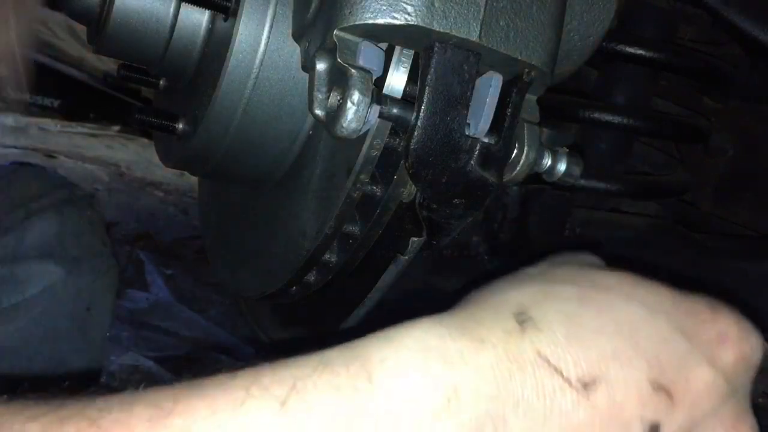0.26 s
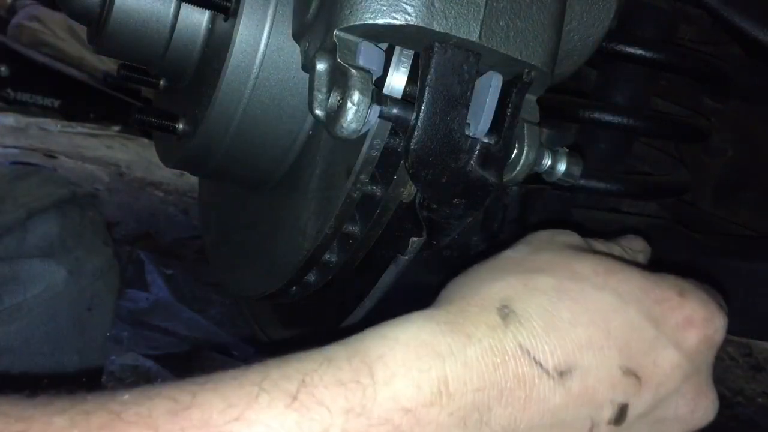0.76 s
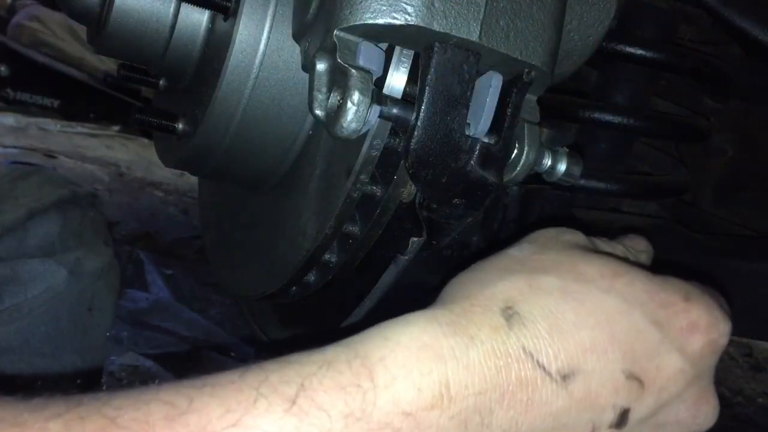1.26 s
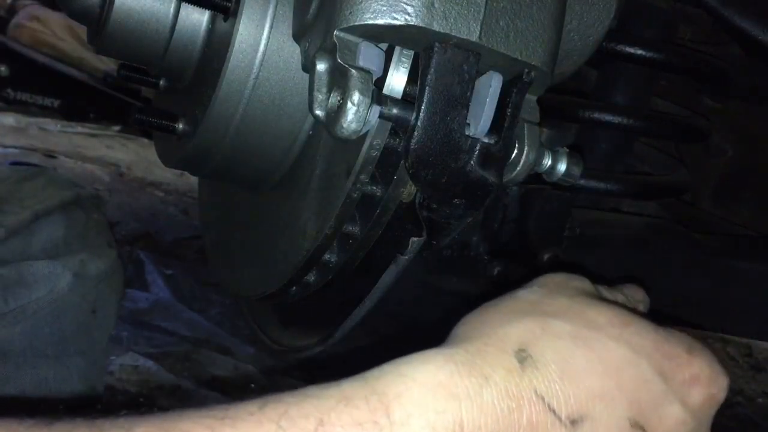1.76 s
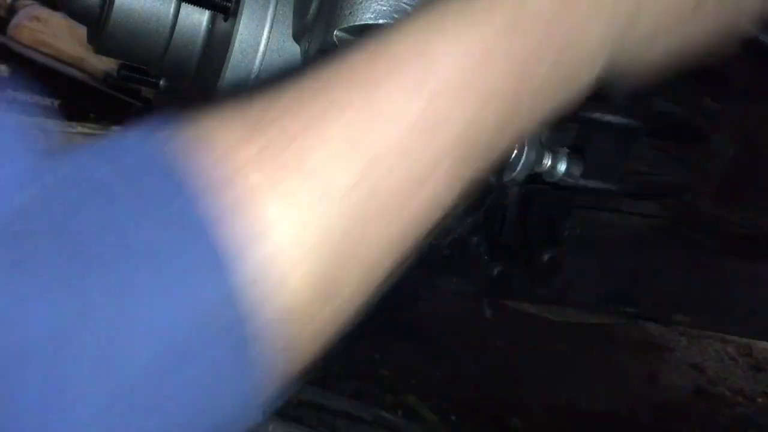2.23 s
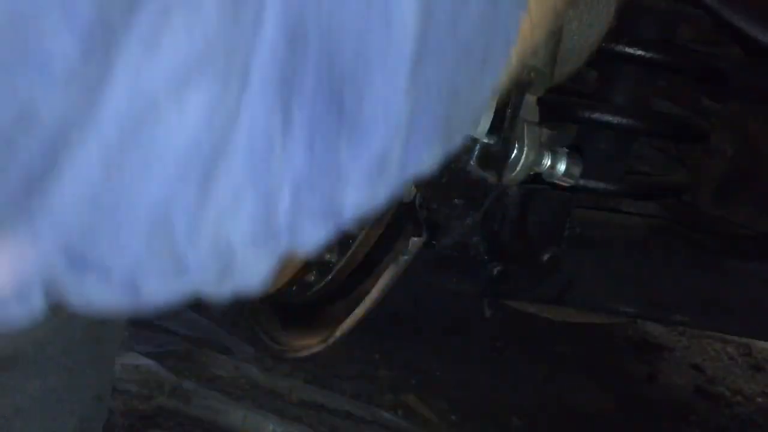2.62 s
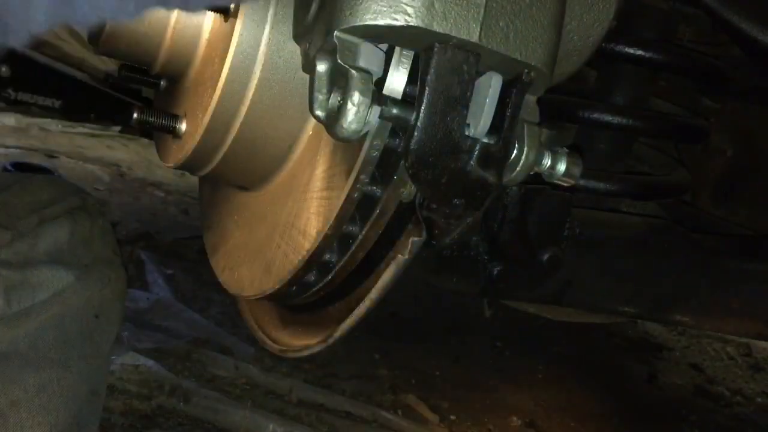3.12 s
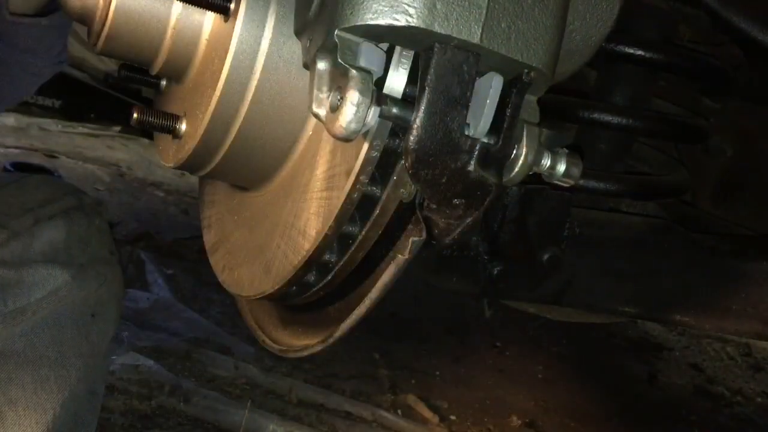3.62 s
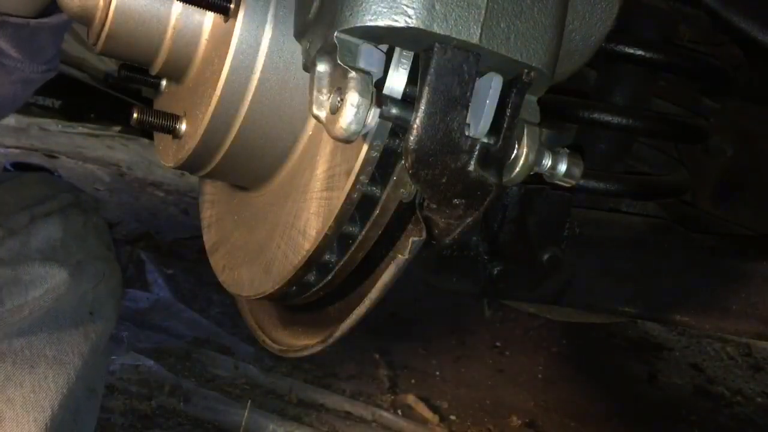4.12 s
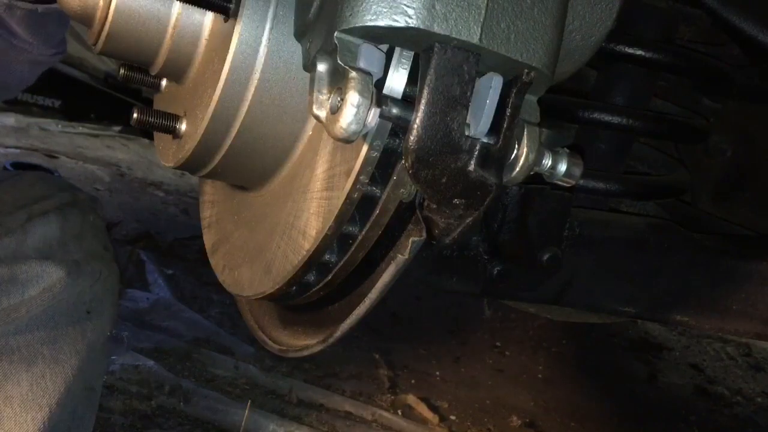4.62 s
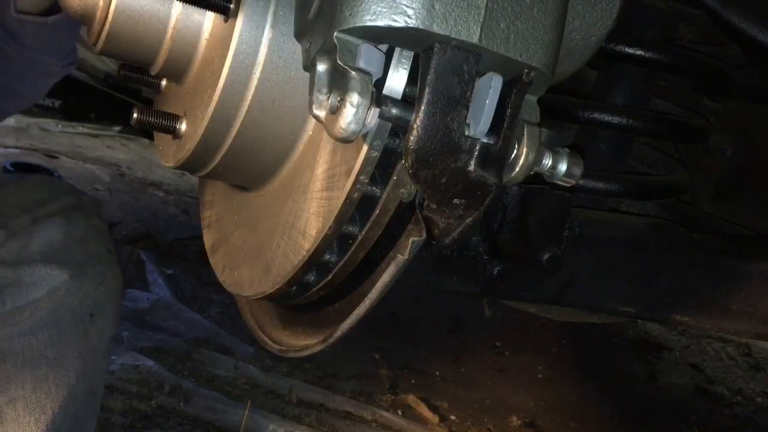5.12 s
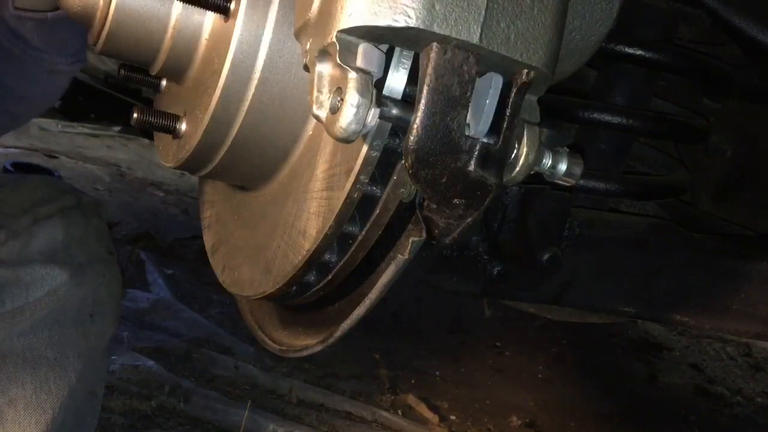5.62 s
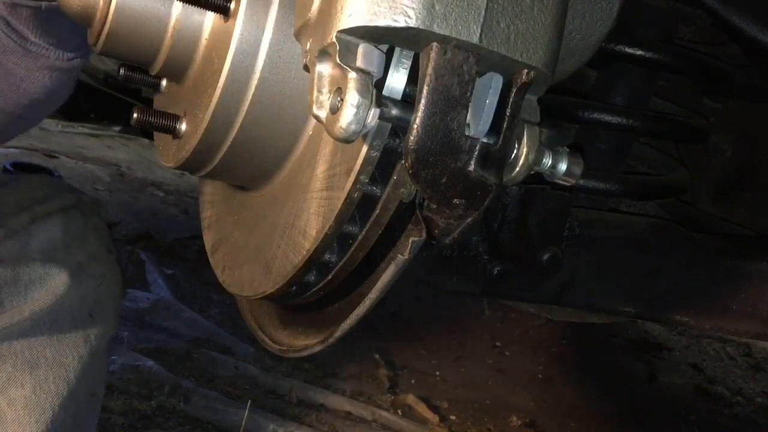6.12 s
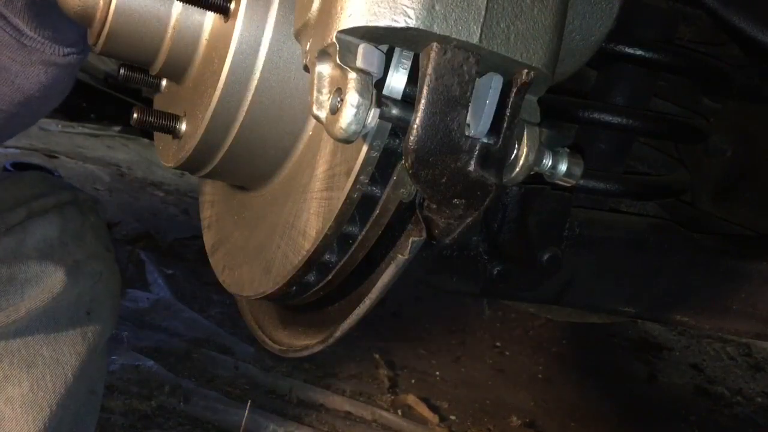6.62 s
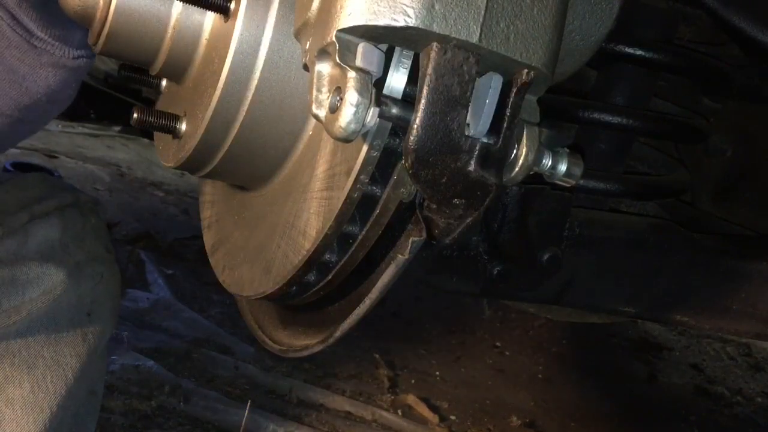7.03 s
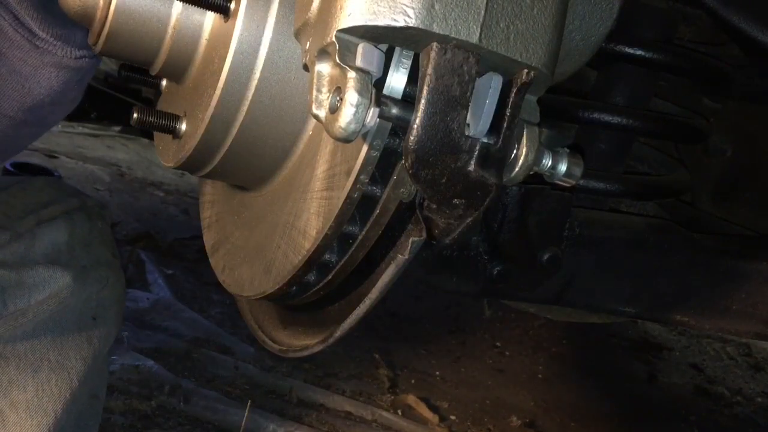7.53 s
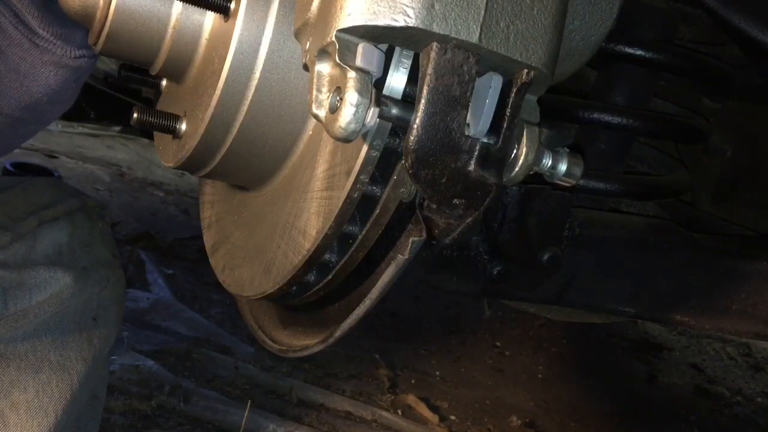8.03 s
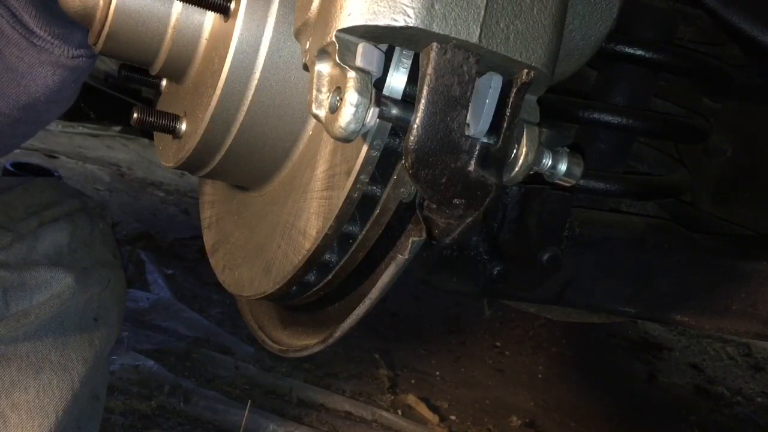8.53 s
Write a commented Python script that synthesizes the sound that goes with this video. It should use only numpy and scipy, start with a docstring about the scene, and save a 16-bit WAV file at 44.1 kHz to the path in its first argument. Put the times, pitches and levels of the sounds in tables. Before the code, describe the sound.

A close microphone in a garage picks up dry, quickly damped metal handling over a faint, wavering motor hum near 120 Hz, low rumble and soft hiss. A faint slide opens; crisp clip ticks come around 0.85 and 1.3 s, then a fuller iron clunk with a brief ring at 1.6. Light scrapes and a weak knock follow at 2.2-2.6. A deep drone swells from 2.4 and fades by 5, and a short low groan bends upward at 3.1. From 3.6 to 4.1 knocks crowd together, heavy and clattering, ending in a loud bright snap at 4.06. Another hard clank lands at 4.8, with softer knocks at 5.4 and 5.9. A low bump and strong clunk come at 6.3-6.4, lighter knocks at 7.0 and 7.6. Small gritty bolt turns repeat from 6.9 to 8.5, with tiny ticks near 8.4 as the hum recedes.

```python
"""Brake caliper work in a garage

Close to the microphone, a cast-iron caliper is worked back over its rotor: loose pads tick in their clips,
the casting knocks and snaps home, parts slide past and a bolt is turned in by hand. Damped noise bursts
excite decaying modes, with garage reflections behind them; short notes and the hub are damped sines.
Farther off, a motor hum, a drone and a groan are unsteady tones over noise for room rumble and hiss."""
import sys
import numpy as np
from scipy import signal
from scipy.fft import rfft, irfft, next_fast_len
from scipy.io import wavfile
from scipy.ndimage import map_coordinates

SR = 44100
rng = np.random.default_rng(int(sys.argv[2]) if len(sys.argv) > 2 else 0)


def wrap_up_sound(samples):
    """Save the sound to the file named by the first command line argument, as 16-bit audio."""
    columns = np.atleast_2d(samples).T
    # keep every value between -1 and 1, then stretch to whole-number steps
    tamed = np.clip(columns, -1, 1)
    steps = np.round(tamed * 32767).astype(np.int16)
    wavfile.write(sys.argv[1], SR, steps)


N = 386316

# edges of the thud, body, clank, bright and sizzle ranges: edge_hz
RANGE_EDGES_HZ = [170, 600, 1800, 3300, 7500, 15500]
RANGE_FILTERS = [signal.butter(4, edges, "band", fs=SR, output="sos")
                 for edges in zip(RANGE_EDGES_HZ, RANGE_EDGES_HZ[1:])]
# modes of caliper, bracket and rotor: mode_hz, relative_db, t60_s
IRON_MODES = [(540, -6, 0.053), (685, -8, .16), (834, -0.5, .16), (1015, -3, .1), (1131, -3.5, 0.13),
              (1244, -5, 0.065), (1320, -5, .18), (1536, -3, .19), (1640, -1, 0.065), (1726, 0.5, 0.14),
              (1810, -2, .12), (1950, -10.5, .15), (2215, -10, .15), (2288, -1.5, .13), (2480, 1, 0.17),
              (2658, 4, .1), (2734, -2.5, .14), (2786, -4.5, .16), (2865, 0.5, .11), (2945, -6, .11),
              (3074, -8.5, .14), (3220, -9.5, .13), (3316, -8.5, .09), (4140, -0.5, .1), (4295, -3.5, .09),
              (5340, 0.5, .07), (6203, 2.5, .06), (6480, -1, 0.048), (6590, -5, 0.07), (8963, -3.5, .05)]
# dense, quickly damped vibration of the clamped parts: frequency_hz, relative_db
CLACK_SPECTRUM = [(150, 1.5), (210, -3), (290, -11), (400, -6.5), (600, -8), (1000, 8), (1600, 7),
                  (2000, 3.5), (2700, 6), (3500, -2), (4700, 0), (6600, -5.5), (9000, -11), (12000, -10.5),
                  (15500, -18.5)]


def amp(db):
    """Decibels to gain."""
    return 10 ** (np.asarray(db) / 20)


def unit(x):
    """Scale to rms 1."""
    return x / np.sqrt(np.mean(x ** 2) + 1e-20)


def along(points, hz):
    """Values of (Hz, value) points, read on a log frequency axis."""
    point_hz, value = np.transpose(points)
    return np.interp(np.log(hz + 1), np.log(point_hz), value)


def curves(rows):
    """One value per sample for each column after the time; the end values are held."""
    time_s, *columns = np.transpose(rows)
    return [np.interp(np.arange(N) / SR, time_s, column) for column in columns]


def wobble(rate_hz, size):
    """A smooth random curve with rate_hz knots a second."""
    knots = rng.standard_normal(int(size * rate_hz / SR) + 4)
    return map_coordinates(knots, [np.arange(size) * rate_hz / SR])


def filtered(x, response):
    """The sound with its spectrum multiplied by a response of frequency."""
    padded = next_fast_len(len(x) + 8192)
    spectrum = rfft(x, padded) * response(np.fft.rfftfreq(padded, 1 / SR))
    return irfft(spectrum, padded)[:len(x)]


def noise(spectrum, size):
    """Noise of rms 1, coloured by a spectrum in dB."""
    return unit(filtered(rng.standard_normal(size), lambda hz: amp(along(spectrum, hz))))


def add(track, start_s, sound):
    """Mix a sound into the track at start_s."""
    part = track[max(round(start_s * SR), 0):][:len(sound)]
    part += sound[:len(part)]


def tone(hz, db, waver_db, drift_hz, octave_db):
    """A low tone with a weak octave, unsteady in pitch and level."""
    phase = 2 * np.pi * np.cumsum(hz + drift_hz * wobble(6.5, N)) / SR
    wave = np.sin(phase) + amp(octave_db) * np.sin(2 * phase)
    return amp(db + waver_db * wobble(8, N)) * unit(wave)


def modal(modes, t, scatter_db):
    """Decaying modes, struck at random strengths and phases, scaled to unit energy."""
    hz, db, t60_s = np.transpose(modes)
    strength = amp(db + scatter_db * rng.uniform(-1, 1, hz.shape))
    phase = 2 * np.pi * rng.random(hz.shape)
    swings = np.sin(np.float32(2 * np.pi * np.outer(hz, t) + phase[:, None]))
    fades = np.exp(np.float32(-np.log(1000) * np.outer(1 / t60_s, t)))
    ring = np.sum(strength[:, None] * swings * fades, axis=0)
    return ring / np.linalg.norm(ring)


def single_modes(rows, rise_s, blur_rad, blur_rate_hz):
    """Damped swings of one resonance, their phase unsteady because the parts sit loose."""
    track, t = np.zeros(N), np.arange(SR // 2) / SR
    for start_s, hz, db, t60_s in rows:
        swing = np.sin(2 * np.pi * hz * t + blur_rad * wobble(blur_rate_hz, len(t)))
        envelope = amp(db - 60 * t / t60_s) * (1 - np.exp(-t / rise_s))
        add(track, start_s, envelope * swing)
    return track


def coloured(colour, db, weight_db, hardness_db):
    """Range levels: weight behind a contact lifts the low ranges, a hard edge the high ones."""
    # gain of each range per dB of weight: lift_db_per_db
    weight_lift = [.8, .72, 0, 0, 0]
    # gain of each range per dB of hardness: lift_db_per_db
    hardness_lift = [0, 0, 0, .6, 1]
    return db + np.array(colour) + weight_db * np.array(weight_lift) + hardness_db * np.array(hardness_lift)


def voiced(sound, levels_db, span_s):
    """Where and how hard the parts touch sets each range's rms level over the first span_s."""
    total = 0
    for sos, db in zip(RANGE_FILTERS, levels_db):
        band = signal.sosfilt(sos, sound)
        total = total + amp(db) * band / np.sqrt(np.mean(band[:int(span_s * SR)] ** 2))
    return total


def in_garage(sound, wet_db, bass_db):
    """The sound and a fresh random tail of reflections; the bass builds up under the car and lingers."""
    # garage reverberation: frequency_hz, t60_s
    decay_times = [(170, .45), (500, 0.28), (1300, 0.25), (3000, 0.14), (6000, 0.12), (14000, 0.139)]
    hz, t, cells = signal.stft(rng.standard_normal(SR // 2), SR, nperseg=256)
    fade = amp(-60 * t / along(decay_times, hz)[:, None]) * (1 - np.exp(-t / 0.0017))
    tail = signal.istft(cells * fade, SR, nperseg=256)[1]
    tail = tail / np.linalg.norm(tail)
    bass = signal.sosfilt(signal.butter(2, 330, fs=SR, output="sos"), tail)
    tail = tail + amp(bass_db) * bass
    return sound + amp(wet_db) * signal.fftconvolve(sound, tail)[:len(sound)]


def contacts(rows, colour, modes, clack_t60_s, ringing_db, rise_s, chatter_db):
    """Rough faces chatter for a moment as they meet: a damped clack that sets the part ringing."""
    firm_db, halving_db = -37.5, 33.5  # the clack dies twice as fast for each such step above firm
    weight_ringing = .2  # dB of ringing gained per dB of weight: a glancing touch barely stirs the part
    edge_damping = .12  # dB of ringing lost per dB of hardness
    track, t = np.zeros(N), np.arange(SR // 4) / SR
    for start_s, db, weight_db, hardness_db in rows:
        t60_s = clack_t60_s * .5 ** ((db - firm_db) / halving_db)
        chatter = amp(-60 * t / t60_s + chatter_db * wobble(900, len(t)))
        clack = chatter * noise(CLACK_SPECTRUM, len(t))
        ring_db = ringing_db + weight_ringing * weight_db - edge_damping * hardness_db
        ring = amp(ring_db) * modal(modes, t, scatter_db=6.5)
        blow = (clack / np.linalg.norm(clack) + ring) * (1 - np.exp(-t / rise_s))
        levels_db = coloured(colour, db, weight_db, hardness_db)
        add(track, start_s, voiced(in_garage(blow, wet_db=-10.0, bass_db=10.0), levels_db, span_s=1 / 60))
    return track


def rubs(rows, colour, grain_db, ringing_db):
    """Sliding surfaces catch and slip in tiny grains that make the iron ring faintly."""
    track, t = np.zeros(N), np.arange(SR * 2 // 5) / SR
    for start_s, length_s, *touch in rows:
        release_s = 0.049 + 5.3 * length_s  # a longer stroke dies away more slowly
        release = amp(-60 * np.maximum(t - length_s, 0) / release_s)
        stroke = np.minimum(2 * t / length_s, 1) * release
        slips = stroke * amp(grain_db * wobble(400, len(t))) * noise(CLACK_SPECTRUM, len(t))
        ring = signal.fftconvolve(slips, modal(IRON_MODES, t, scatter_db=6))[:len(t)]
        rub = in_garage(slips + amp(ringing_db) * ring, wet_db=-12.0, bass_db=1)
        add(track, start_s, voiced(rub, coloured(colour, *touch), span_s=length_s))
    return track


def motor_hum():
    """A distant motor slowly gathers speed, so its unsteady tone climbs."""
    # loudness of the hum as it swells and recedes: time_s, level_db
    hum_level = [(0, -54.5), (.75, -47), (1.4, -53), (2.7, -53), (3.1, -44), (4.5, -49), (5.7, -46.5),
                 (7.3, -58), (8.76, -56.5)]
    level_db, = curves(hum_level)
    hz = 117.3 + 1.25 * np.arange(N) / SR
    return tone(hz, level_db - .5, waver_db=2.5, drift_hz=.5, octave_db=-25.0)


def deep_drone():
    """A steady-pitched, slightly drifting tone below the hum swells once."""
    start_s, attack_s, hold_s, release_s = 2.4, 0.2, 1.5, .9
    rest_db, swell_db = -61.5, 14
    corners_s = np.cumsum([start_s, attack_s, hold_s, release_s])
    swell = np.interp(np.arange(N) / SR, corners_s, [0, 1, 1, 0])
    return tone(83, rest_db + swell_db * swell, waver_db=3.0, drift_hz=.5, octave_db=-27.0)


def room_rumble():
    """Low-frequency noise with a slow random change of level."""
    # low room rumble: frequency_hz, relative_db_per_hz
    rumble_spectrum = [(15, -55), (28, -25.5), (47, 2.5), (65, 5), (120, -1), (160, -7), (215, -9),
                       (280, -25.5), (400, -35), (900, -79.5)]
    return amp(-50.3 + 1.6 * wobble(2.5, N)) * noise(rumble_spectrum, N)


def air_hiss():
    """Room air and microphone hiss: faint, almost steady coloured noise."""
    # room air and microphone hiss: frequency_hz, relative_db_per_hz
    air_spectrum = [(150, -10), (300, -2), (480, -4), (820, 0), (1300, -4), (2000, -9), (3200, -13),
                    (5000, -17), (6500, -17), (10000, -23), (15800, -24)]
    return amp(-65.7 + 0.17 * wobble(2.6, N)) * noise(air_spectrum, N)


def sliding_parts():
    """Tool, sleeve and parts slide past in short grainy strokes."""
    # strokes, level before range colour: start_s, length_s, level_db, weight_db, hardness_db
    slide_rows = [(0, 0.13, -60.5, -13, -5.5), (.186, 0.05, -64, 0.5, 2), (1.162, 0.028, -57.5, 6, -2.5),
                  (2.242, 0.031, -53, 1, 1.2), (2.46, 0.04, -83.5, 5, 21), (2.726, 0.15, -72.5, 5, 1.5),
                  (3.578, 0.0218, -55.5, -4, -11), (3.95, 0.02, -47.5, 8.5, -8),
                  (4.024, .034, -44.5, -5.5, 13.5), (4.774, .02, -56.5, -1, -9),
                  (7.77, 0.057, -70.5, -6, -12), (7.96, .025, -72.5, -4.5, 1)]
    # base level of the five ranges, thud to sizzle: level_db
    slide_colour = [-1, -0.5, -1.5, -1, -6]
    return rubs(slide_rows, slide_colour, grain_db=3.5, ringing_db=-11.5)


def pad_ticks():
    """Pads tick in their spring clips, whose thin steel rings briefly; the first tick comes as a tool is
    handled."""
    # ticks, level before range colour: start_s, level_db, weight_db, hardness_db
    tick_rows = [(.043, -59, -2.5, 3), (.801, -61.5, 13, 4.5), (.856, -34, -6, 1.5),
                 (.897, -38.5, -9, -6.5), (.995, -54, -2, -16), (1.27, -55, -4, 19),
                 (1.279, -41, -1.5, 2.5), (1.897, -62.5, -7, -1), (2.325, -61, 3, -14),
                 (2.742, -61.5, 1, -6.5), (3.795, -47.5, 0.5, 1.5), (3.904, -55, 4.5, -0.5),
                 (6.29, -62.5, 10.5, -20), (8.352, -67, 6, -2), (8.385, -66, -3, -15)]
    # base level of the five ranges, thud to sizzle: level_db
    tick_colour = [-6, -2.5, -10.5, 1, -7]
    # thin steel of the pad clips: mode_hz, relative_db, t60_s
    clip_modes = [(545, -5, .08), (840, 0.5, .08), (1750, -6.5, .08), (3560, 2.5, .04), (3930, -1.5, .035),
                  (5750, 2.5, .04), (6330, -2, .04), (9790, 1.5, .04)]
    return contacts(tick_rows, tick_colour, clip_modes, clack_t60_s=.028, ringing_db=-4,
                    rise_s=0.0006, chatter_db=7.5)


def casting_knocks():
    """The casting lands flat or rocks from edge to edge; a favoured mode stands out, the rotor may sing on."""
    # casting on rotor and bracket, level before range colour; gap 0 when it lands flat:
    # start_s, level_db, weight_db, hardness_db, rocking_gap_s, favoured_mode_hz
    knock_rows = [(1.588, -36.5, 8, -9, 0.0053, 810), (2.586, -53.5, 6.5, 9, 0.005, 1650),
                  (3.046, -59, 8.5, 11, 0.0048, 3360), (3.607, -39.5, 10, 6.5, 0.0057, 1651),
                  (3.762, -34, -6.5, -18, 0.0015, 2457), (3.81, -40.5, -2, 6.5, 0.00063, 2650),
                  (3.828, -31.5, 0, 8, .004, 2865), (3.938, -39.5, 7.5, -5, 0.00034, 1726),
                  (3.975, -35, 7, -4, 0, 1633), (4.021, -38.5, -3.5, 16.5, 0.00098, 3325),
                  (4.059, -22.5, -5, 23, .006, 1515), (4.798, -21, -8, 3.5, .007, 2780),
                  (4.903, -37, -13.5, -9, 0, 2831), (5.372, -42, 9.5, -0.5, 0.0033, 2693),
                  (5.489, -61, 12, -9, 0, 2810), (5.923, -50, -4.5, -11.5, 0.0038, 2359),
                  (6.415, -28.5, -14.5, -8, .008, 2310), (6.985, -40.5, -20, -3, 0.0011, 3086),
                  (7.597, -39.5, -8, -13.5, 0.0035, 2662)]
    # base level of the five ranges, thud to sizzle: level_db
    knock_colour = [-11.5, -1.53, -1, -8, -17.5]
    # blows that land on the rotor: start_s, level_db
    rotor_blows = [(1.592, -44), (4.075, -44)]
    rotor_hz, rotor_t60_s = 1150, 0.44
    favoured_db, favoured_t60_s = -3.5, 0.15  # the mode that the point of contact brings out
    # one edge touches first, the other last: change in level, weight and hardness (dB)
    first_edge, last_edge = (-8, -4, -0.95), (-4, 5, -7.5)
    touches = []
    notes = [(start_s, rotor_hz, db, rotor_t60_s) for start_s, db in rotor_blows]
    for start_s, *touch, gap_s, hz in knock_rows:
        touches.append((start_s, *touch))
        if gap_s > .001:  # shorter gaps add no separate edge contacts
            touches.append((start_s - gap_s, *np.add(touch, first_edge)))
            touches.append((start_s + gap_s, *np.add(touch, last_edge)))
        range_db = coloured(knock_colour, *touch)[np.searchsorted(RANGE_EDGES_HZ, hz) - 1]
        notes.append((start_s + gap_s, hz, range_db + favoured_db, favoured_t60_s))
    clanks = contacts(touches, knock_colour, IRON_MODES, clack_t60_s=.05, ringing_db=-4,
                      rise_s=0.003, chatter_db=3)
    return clanks + single_modes(notes, rise_s=0.00042, blur_rad=.4, blur_rate_hz=260)


def short_notes():
    """Short, quickly damped notes: some colour a knock, others are light touches heard alone."""
    # short damped notes: start_s, pitch_hz, level_db
    note_rows = [(1.59, 986, -19), (1.591, 1210, -18.5), (3.977, 727, -27), (3.978, 1650, -30.5),
                 (4.06, 7160, -6), (5.173, 1098, -40), (6.293, 367, -32.5), (6.308, 306.7, -29.5),
                 (5.308, 2343, -50), (7.862, 3520, -51.5), (8.288, 1513, -49.5)]
    t60_s = 0.052
    return single_modes([(*note, t60_s) for note in note_rows], rise_s=0.0011, blur_rad=0.35, blur_rate_hz=340)


def low_groan():
    """A low tone bends upward as it briefly swells, leaving a faint held pitch."""
    # groan, end values held: time_s, pitch_hz, level_db
    groan_curve = [(2.98, 120.5, -91), (3.06, 125.4, -36.5), (3.17, 143.6, -43.5), (3.27, 145, -65)]
    return tone(*curves(groan_curve), waver_db=1.5, drift_hz=2, octave_db=-22)


def rocking_hub():
    """Heavy contacts set the hub rocking on its suspension in a few low modes."""
    # modes of the hub: mode_hz, relative_db, t60_s
    hub_modes = [(57.3, -7.5, .45), (104.76, 0.5, .35), (186, -9.5, 0.32)]
    # heavy contacts that set it going: start_s, level_db
    jolt_rows = [(3.845, -25), (4.08, -36), (4.81, -37.5), (6.3, -34)]
    notes = [(start_s, hz, db + mode_db, t60_s) for start_s, db in jolt_rows for hz, mode_db, t60_s in hub_modes]
    return single_modes(notes, rise_s=.012, blur_rad=.8, blur_rate_hz=42)


def bolt_turns():
    """A bolt is turned in by hand, each turn a short grainy rub with the iron ringing."""
    # turns, level before range colour: start_s, length_s, level_db
    turn_rows = [(6.897, 0.071, -67.5), (7.324, 0.043, -61), (7.714, 0.025, -53), (8.113, 0.052, -60),
                 (8.519, 0.049, -61)]
    # base level of the five ranges, thud to sizzle: level_db
    turn_colour = [-13, -7.5, 0, -9, -18.5]
    neutral_touch = (0, 0)  # weight and hardness (dB)
    return rubs([(*turn, *neutral_touch) for turn in turn_rows], turn_colour, grain_db=4.0, ringing_db=-7.5)


def scene():
    """The brake work close by, over the garage background."""
    background = motor_hum() + deep_drone() + room_rumble() + air_hiss() + low_groan()
    handling = sliding_parts() + pad_ticks() + bolt_turns()
    iron = casting_knocks() + short_notes() + rocking_hub()
    return (background + handling + iron)[None]


def record(dry):
    """The recorder rounds off the loudest peaks and keeps nothing above its band limit."""
    ceiling, top_hz = .95, 15900
    rounded = dry[0] / (1 + (dry[0] / ceiling) ** 4) ** (1 / 4)
    return filtered(rounded, lambda hz: hz < top_hz)[None]


dry = scene()
out = record(dry)
wrap_up_sound(out)
```